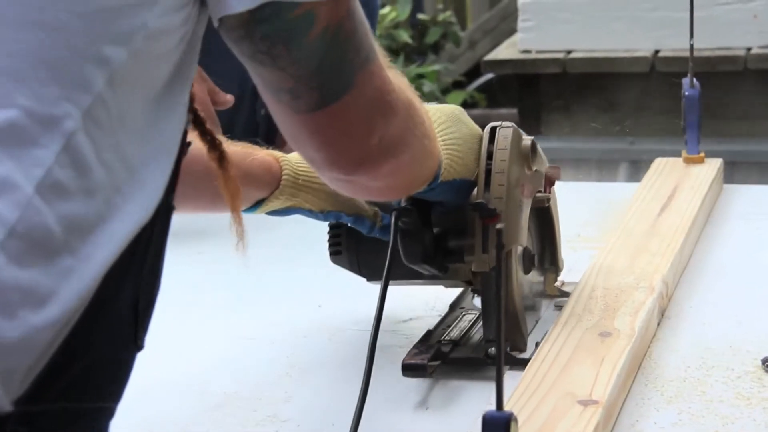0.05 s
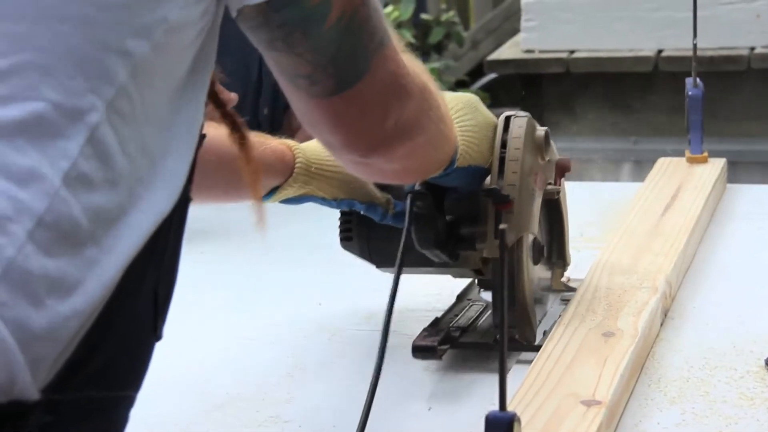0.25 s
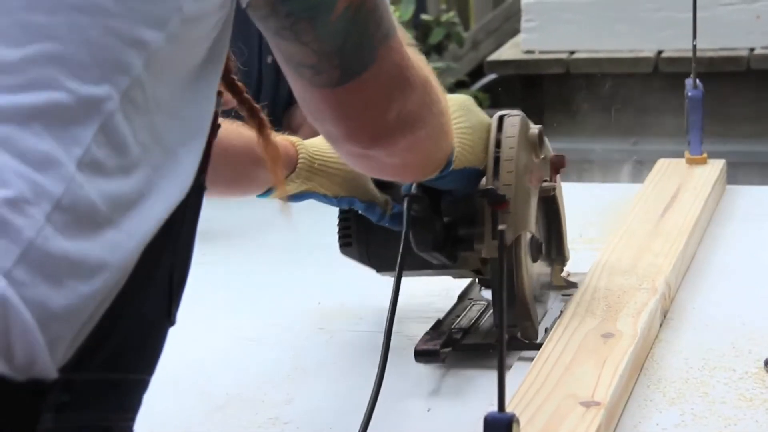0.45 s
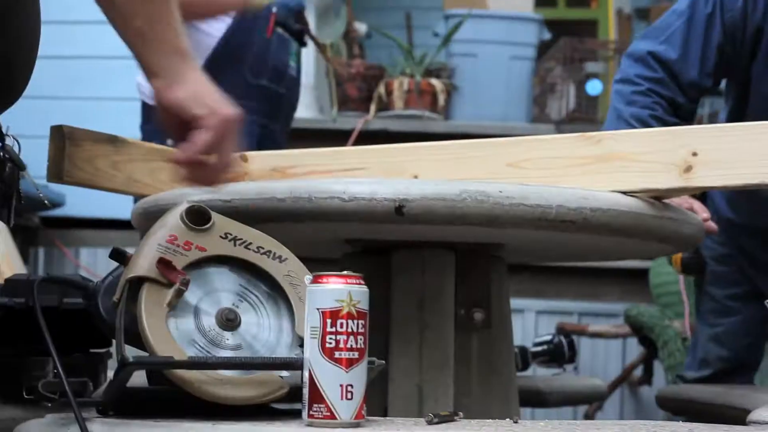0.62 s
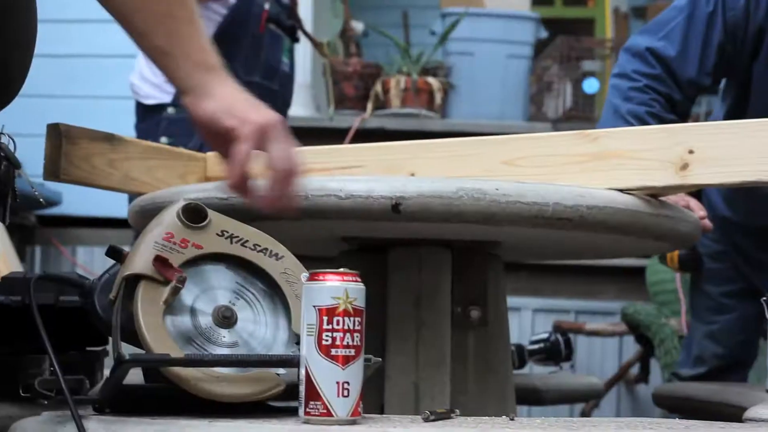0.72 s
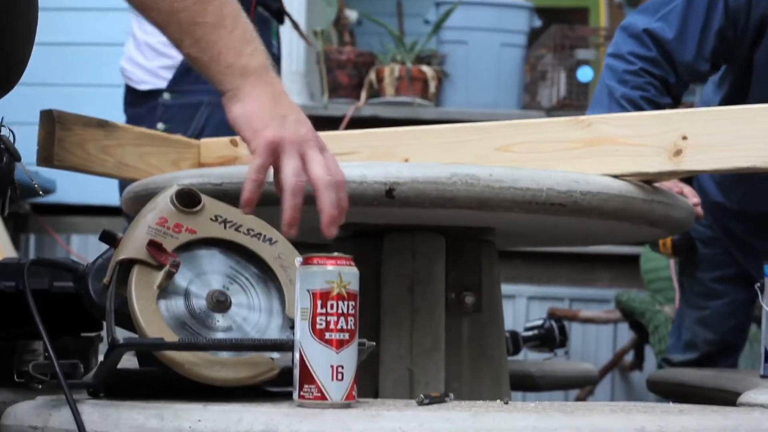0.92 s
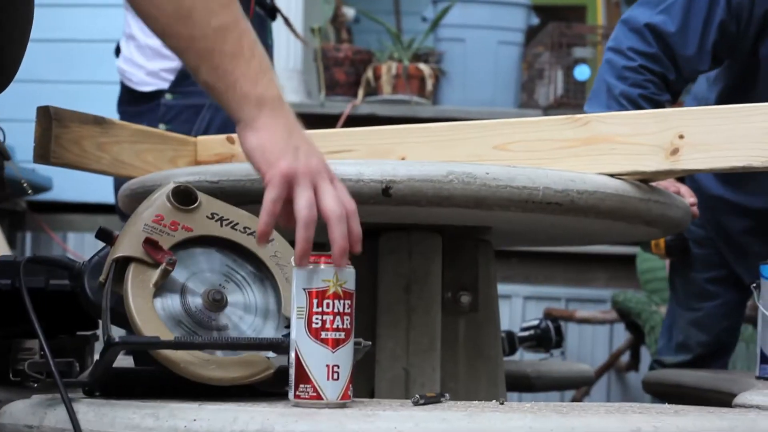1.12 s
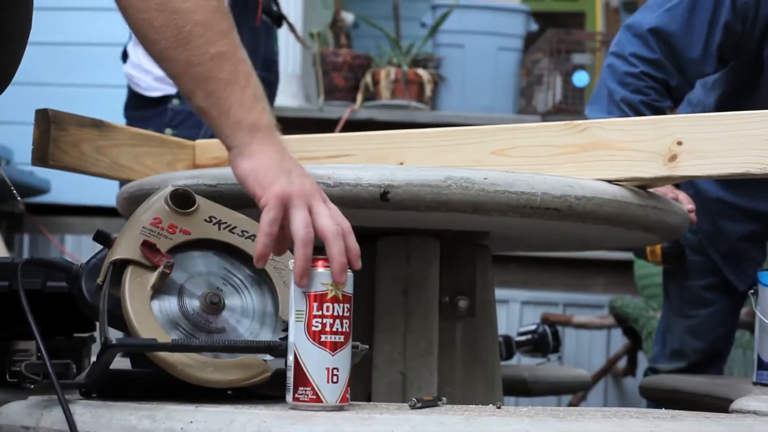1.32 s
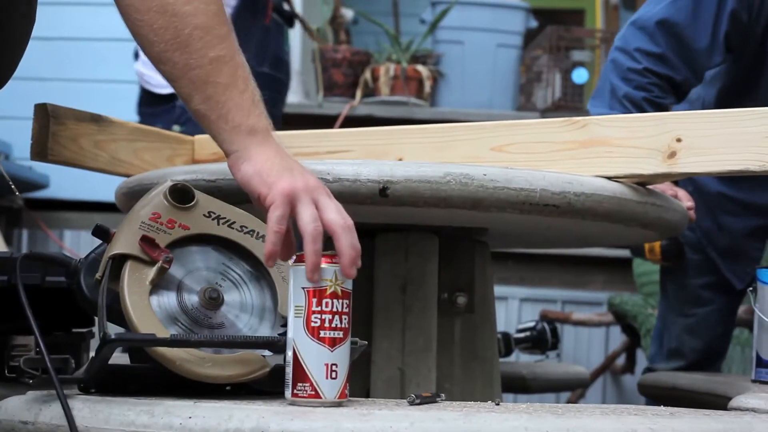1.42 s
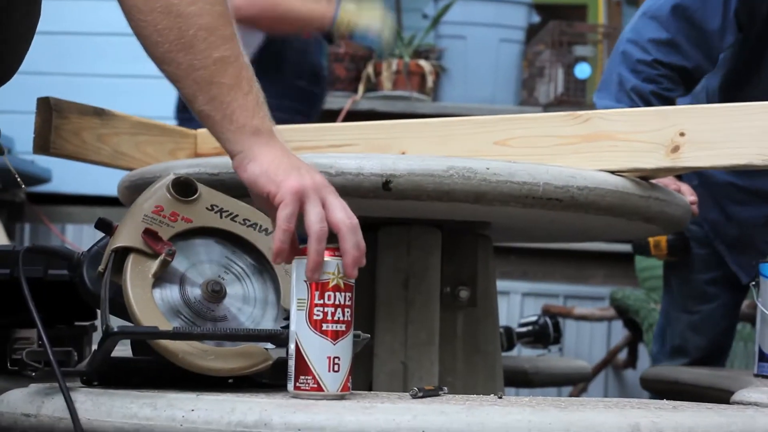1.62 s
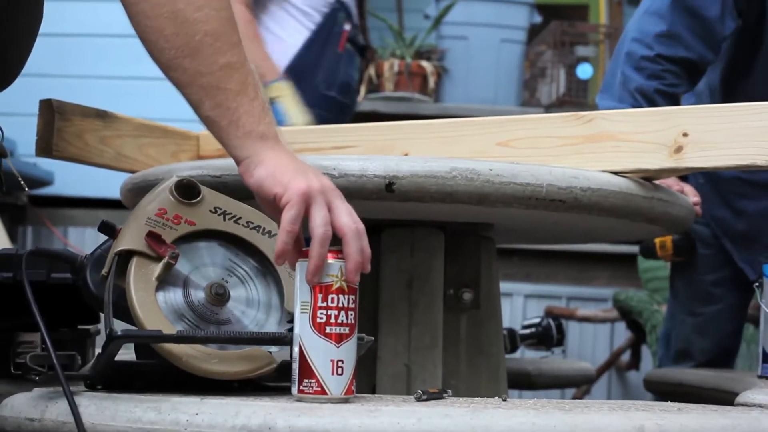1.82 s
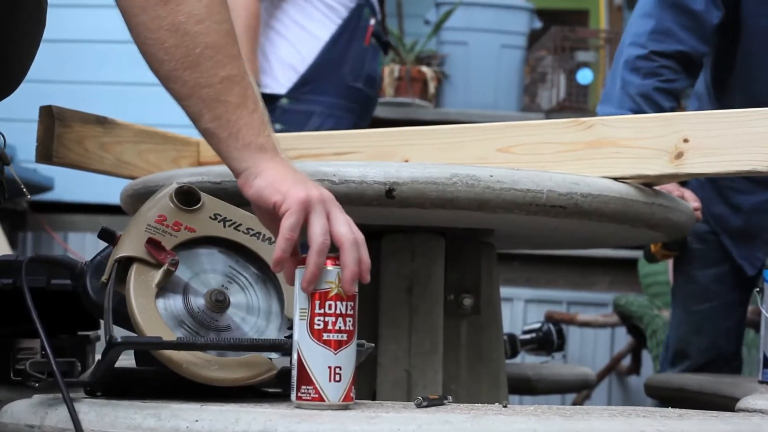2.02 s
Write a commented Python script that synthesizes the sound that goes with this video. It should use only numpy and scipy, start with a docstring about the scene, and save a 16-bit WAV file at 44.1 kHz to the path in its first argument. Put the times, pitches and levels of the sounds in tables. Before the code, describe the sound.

A circular saw whines through a plank, bogs down and stalls, leaving the steel blade ringing and scraping

```python
"""Circular saw stalling in a plank

Outdoors, a blade of 24 teeth whines over the hiss of chips, bogs down and stalls; its tones follow the tooth rate.
The steel disc rings on as fading modes, then rubbing noise swells in the steel's resonances, with harder catches.
Short steady tones come and go. Low noise makes a background rumble and wind puffs that thump the microphone.
The yard adds an echo of fading random reflections."""
import sys
import numpy as np
from scipy import signal
from scipy.fft import rfft, irfft, next_fast_len
from scipy.io import wavfile
from scipy.ndimage import uniform_filter1d, map_coordinates

SR = 44100
rng = np.random.default_rng(int(sys.argv[2]) if len(sys.argv) > 2 else 0)


def master_out(mix):
    """Clip the mix to full scale and print it as 16-bit PCM to the path in sys.argv[1]."""
    frames = np.transpose(np.atleast_2d(mix))
    ceiling = np.clip(frames, -1, 1)
    pcm = np.round(ceiling * 32767).astype(np.int16)
    wavfile.write(sys.argv[1], SR, pcm)


N = 90581
TIME_S = np.arange(N) / SR
RING_S, STALL_FADE_S = 0.928, 0.025  # when the disc starts to ring; fade time of the whine and the rubbing
PATCHY_DB = 1.6  # unevenness of the hiss and rubbing noise


def amp(db):
    """Turn decibels into a plain factor."""
    return 10 ** (np.asarray(db) / 20)


def unit(x):
    """Scale a signal to an rms of 1."""
    return x / np.sqrt(np.mean(np.abs(x) ** 2) + 1e-20)


def curves(rows):
    """Draw straight lines between the rows: one value per sample for each column after the time."""
    times_s, *columns = np.transpose(rows)
    return [np.interp(TIME_S, times_s, column) for column in columns]


def wobble(rate):
    """A smooth random curve through so many random points (knots) a second."""
    knots = rng.standard_normal(int(N * rate / SR) + 4)
    return map_coordinates(knots, [np.arange(N) * rate / SR])


def jitter(rate):
    """A complex random curve of rms 1, with straight lines between so many knots a second."""
    knots = rng.standard_normal((2, int(N * rate / SR) + 2))
    complex_knots = knots[0] + 1j * knots[1]
    return unit(np.interp(np.arange(N) * rate / SR, np.arange(knots.shape[1]), complex_knots))


def filtered(x, response):
    """Multiply the spectrum of x by a complex response of frequency."""
    size = next_fast_len(N + SR // 2)
    hz = np.fft.rfftfreq(size, 1 / SR)
    return irfft(rfft(x, size) * response(hz), size)[..., :N]


def noise(spectrum, patchy_db):
    """Coloured noise of rms 1 whose gain varies in random patches of time and frequency."""
    knot_hz, knot_db = np.transpose(spectrum)
    grid = signal.stft(rng.standard_normal(N), nperseg=512)[2]
    patches = uniform_filter1d(rng.standard_normal(grid.shape), 4, axis=0)
    patches = uniform_filter1d(patches, 8, axis=1)
    patchy = signal.istft(grid * amp(patchy_db * unit(patches)), nperseg=512)[1][:N]

    def colour(hz):
        return amp(np.interp(np.log(hz + 1), np.log(knot_hz + 1), knot_db, -120, -120))

    return unit(filtered(patchy, colour))


def rumble_and_puffs():
    """A low background rumble whose level rises and falls, and short wind puffs of the same noise."""
    # Rumble level before a slight wobble: t/s, level/dB
    rumble_level = [(0, -69), (.7, -64), (.8, -48.5), (1.2, -67.5), (2.05, -47.5)]
    # Wind puffs on the microphone: centre t/s, level/dB
    puffs = [(.02, -46), (.15, -41), (.78, -42), (.86, -62), (1.04, -49), (1.081, -40.5), (1.11, -43),
             (1.16, -40.5), (1.28, -57), (1.68, -52), (1.78, -52), (1.906, -36.5), (1.97, -32.5),
             (2.045, -35.5)]
    # Colour of the low noise, before scaling to rms 1: f/Hz, level per Hz/dB
    low_colour = [(12, -36), (20, -12.5), (64, 1.5), (296, -17.5), (357, -14.5), (400, -15.5), (520, -48),
                  (880, -120)]
    puff_s = .015  # from a puff's centre to 1/e of its height
    envelope = amp(curves(rumble_level)[0] + 0.71 * wobble(11.99))
    for centre_s, db in puffs:
        envelope = envelope + amp(db) * np.exp(-((TIME_S - centre_s) / puff_s) ** 2)
    return envelope * noise(low_colour, patchy_db=1)


def yard_echo(saw):
    """Yard echo: a burst of fading random reflections smears the delayed saw sound."""
    t60_s, level_db, delay_samples = .2, -15, 400
    tail_samples = SR // 3
    tail = rng.standard_normal(tail_samples) * amp(-60 * np.arange(tail_samples) / SR / t60_s)
    tail = tail / np.linalg.norm(tail)
    return amp(level_db) * signal.fftconvolve(np.pad(saw, (delay_samples, 0)), tail)[:N]


def steady_tones():
    """Short sine tones that swell and fade, wavering in level and pitch."""
    # Tones: start t/s, length/s, centre f/Hz, level before wavering/dB
    short_tones = [(0.543, .11, 915, -29), (0.909, 0.098, 1709, -25), (0.919, 0.092, 6035, -28),
                   (0.904, 0.038, 6460, -31), (1.773, 0.039, 5303, -35), (1.777, 0.37, 954, -32),
                   (2.003, 0.13, 5300, -35)]
    waver_db, drift_hz = 4, 5
    total = np.zeros(N)
    for start_s, length_s, hz, db in short_tones:
        progress = np.clip((TIME_S - start_s) / length_s, 0, 1)
        arch = np.sqrt(np.sin(np.pi * progress).clip(0))
        level = amp(db + waver_db * wobble(50))
        phase = 2 * np.pi * np.cumsum(hz + drift_hz * wobble(40)) / SR
        total = total + level * arch * np.sin(phase)
    return total


def catch_envelope():
    """Each harder catch of the rubbing rises fast and dies away more slowly."""
    # Catches: t/s, level before the rise and fall shape/dB
    catch_list = [(1.005, -23), (1.035, -29), (1.46, -29), (1.51, -28.5), (1.555, -30.5), (1.6, -40),
                  (1.683, -25), (1.725, -24.5), (1.775, -30), (1.819, -26), (1.87, -21.5), (1.915, -28),
                  (1.958, -19), (2.006, -20), (2.04, -20.5)]
    rise_s, fall_s = .004, .022
    envelope = np.zeros(N)
    for start_s, db in catch_list:
        since = np.maximum(TIME_S - start_s, 0)
        envelope = envelope + amp(db) * (1 - np.exp(-since / rise_s)) * np.exp(-since / fall_s)
    return envelope


def ticks():
    """Each tick is a pair of quickly dying sine modes."""
    # Ticks: t/s, starting level of each mode/dB, lower mode f/Hz
    tick_list = [(1.019, -20.5, 4190), (1.513, -23, 4140), (1.564, -27, 2620), (1.871, -20.5, 2570)]
    t60_s, upper_ratio = .016, 1.2  # decay time; second mode over the first
    total = np.zeros(N)
    for start_s, db, hz in tick_list:
        since = np.maximum(TIME_S - start_s, 0)
        for ratio in (1, upper_ratio):
            total = total + amp(db - 60 * since / t60_s) * np.sin(2 * np.pi * ratio * hz * since)
    return total


def scraping():
    """Rubbing noise sounds through the steel's resonances, with harder catches and a few ticks."""
    # Rubbing strength before the overall -6 dB: t/s, level/dB
    rub_level = [(0.9, -21), (1.012, -31), (1.316, -29.5), (1.594, -28), (2.05, -23)]
    # Colour of the rubbing, before scaling to rms 1: f/Hz, level per Hz/dB
    rub_colour = [(71, -30), (120, -17), (360, -12.5), (563, -10), (975, -1.5), (1170, -4), (3300, -7),
                  (4760, -9.5), (5960, -11), (7010, -13.5), (15500, -42)]
    # Resonances of the rubbed steel: f/Hz, width/Hz, level before the shared boost/dB
    resonances = [(880, 11, -19), (2940, 25, -22), (3260, 61, 1.5), (3410, 14, 10), (3915, 24, -1.5),
                  (5040, 19, -18), (5270, 9, 13), (5990, 85, 6), (6540, 83, -24), (8050, 270, -7)]
    scrape_db, turn_db, crackle_db = -6, 1.6, 1.7  # overall level; unevenness of the rubbing and of a catch
    boost_db, catch_low_hz = 6, 1160  # boost of all resonances; catches are thinned out below catch_low_hz

    def steel(f):
        modes = sum(amp(db) * 1j * f * width / (centre * centre - f * f + 1j * f * width)
                    for centre, width, db in resonances)
        return 1 + amp(boost_db) * modes

    def low_cut(f):
        return f * f / (f * f + catch_low_hz ** 2)

    fade_in = np.clip((TIME_S - RING_S) / STALL_FADE_S, 0, 1)
    envelope = amp(curves(rub_level)[0] + scrape_db + turn_db * wobble(60)) * fade_in
    rub = noise(rub_colour, PATCHY_DB)
    bright = filtered(noise(rub_colour, patchy_db=3.5), low_cut)
    catches = catch_envelope() * amp(crackle_db * wobble(250)) * bright
    # dividing by the strength of steady rubbing keeps the steel from changing its loudness
    rubbing = filtered(envelope * rub + catches, steel) / np.std(filtered(rub, steel))
    return rubbing + ticks()


def ringing():
    """The freed disc rings in slightly unsteady modes; the rubbing then damps the lower ones most."""
    # Modes of the disc: centre f/Hz, level before swell, waver and decay/dB, t60 before extra damping/s, swell/s
    modes = [(1575, -36, 2, 0.061), (1712, -42, 1.1, 0.017), (1870, -37.5, 7.1, 0.39),
             (2268, -34, 2.6, .04), (4242, -28, .75, .35), (4992, -34, 1.9, .15), (2417, -23, 0.82, 0.043),
             (3160, -63, 3, 0.057), (3280, -57, 4.4, 0.059), (3996, -29, 2.6, 0.11), (4829, -30, .4, .01),
             (5170, -27.5, 1.4, 0.039), (6035, -38, 1.2, .01), (7752, -59, 1.5, .02)]
    waver_db, drift_hz = 1.8, 4
    damp_s, damp_t60_s, damp_hz = 1.55, 1, 2268  # damping starts; its t60 for a mode at damp_hz
    since = np.maximum(TIME_S - RING_S, 0)
    damping_db = 60 * np.maximum(TIME_S - damp_s, 0) / damp_t60_s
    total = np.zeros(N)
    for hz, db, t60_s, swell_s in modes:
        decay_db = 60 * since / t60_s + damping_db * (damp_hz / hz) ** 2
        level = amp(db - decay_db + waver_db * wobble(11.8))
        swell = 1 - np.exp(-since / max(swell_s, 1e-3))
        phase = 2 * np.pi * np.cumsum(hz + drift_hz * wobble(11)) / SR
        total = total + level * swell * np.sin(phase)
    return total


TEETH = 24


def tone(turn, multiple, runout, blur):
    """One tone of rms about 1: uneven teeth swell it in step with the turns, the wood's grain blurs it."""
    slow_hz, fast_hz, fast_share = 49.84, 297.8, .7  # knots a second of the slow and fast blur
    weights = rng.standard_normal((3, 2)) @ [1, 1j]
    spin = np.exp(2j * np.pi * turn)
    pattern = unit(weights[0] * spin + weights[1] / spin + weights[2] * spin ** 2)
    grain = jitter(slow_hz) + fast_share * jitter(fast_hz)
    size = np.sqrt((1 + runout ** 2 + blur ** 2 * (1 + fast_share ** 2)) / 2)
    carrier = np.exp(2j * np.pi * multiple * TEETH * turn)
    return ((1 + runout * pattern + blur * grain) / size * carrier).real


def chip_hiss(hiss_db, stall_s):
    """Chips hiss as coloured noise, with a bright spit just before the stall, then die away."""
    # Colour of the chips, before scaling to rms 1: f/Hz, level per Hz/dB
    chip_colour = [(71, -45), (120, -19.5), (255, -10.5), (432, -21), (917, -4.5), (1830, -7.5),
                   (2110, -0.5), (2810, -7), (4220, 0.5), (5840, -6.5), (7610, 0), (15500, -27)]
    # Colour of the bright spit, before scaling to rms 1: f/Hz, level per Hz/dB
    spit_colour = [(5000, -32), (8500, 5), (12000, -2), (15600, -9)]
    boost_db, swell_db, t60_s = 2, 1, 0.34
    spit_s, spit_rise_s, spit_db = 0.914, 0.07, -36  # time of full strength, rise time, level
    decay_db = 60 * np.maximum(TIME_S - stall_s, 0) / t60_s
    swell = amp(swell_db * wobble(39.76) - decay_db)
    spit_rise = np.exp(-(np.maximum(spit_s - TIME_S, 0) / spit_rise_s) ** 2)
    chips = amp(hiss_db + boost_db) * noise(chip_colour, PATCHY_DB)
    spit = amp(spit_db) * spit_rise * noise(spit_colour, PATCHY_DB)
    return swell * (chips + spit)


def cutting():
    """Teeth and gears whine at multiples of the tooth rate over chip hiss, until the blade stalls."""
    # The cut: t/s, tooth rate f/Hz, level of tones 1 to 6/dB (six columns), hiss level before its boost/dB
    cut = [(0.0, 1100, -22, -21, -13.5, -21, -24, -10.5, -21),
           (0.038, 1093, -25.5, -25.5, -11, -13.5, -19.5, -26, -20.5),
           (0.066, 1090, -26.5, -28, -25.5, -13, -30, -20, -19),
           (0.098, 1086, -21.5, -18.5, -24.5, -18.5, -27.5, -20.5, -20.5),
           (0.148, 1082, -21.5, -19.5, -25, -26.5, -24, -22, -21.5),
           (0.164, 1084, -20.5, -20.5, -30.5, -16.5, -30, -21, -22.5),
           (0.244, 1082, -26.5, -19.5, -30, -28, -22, -26, -21),
           (0.276, 1076, -31.5, -28, -27.5, -32, -31.5, -21.5, -21),
           (0.412, 1081, -22, -23, -22, -22, -27, -34, -19.5),
           (0.426, 1081, -20.5, -25, -22, -16, -38, -25, -24),
           (0.464, 1083, -23, -20.5, -27, -16.5, -33, -22, -22.5),
           (0.524, 1076, -26, -27.5, -25, -19.5, -25.5, -33, -24.5),
           (0.574, 1036, -35.5, -20, -24.5, -32, -38, -32, -25),
           (0.618, 1004, -32.5, -25, -32.5, -24, -24.5, -33, -24),
           (0.668, 1004, -33.5, -16.5, -29, -17, -23, -21, -23.5),
           (0.716, 919.3, -29, -30.5, -35, -25, -34, -28, -24),
           (0.778, 809.4, -27.5, -25.5, -34, -26, -26.5, -32, -26),
           (0.796, 741, -37.5, -29, -42, -36, -26.5, -37, -25.5),
           (0.836, 660, -36, -20.5, -26.5, -34, -37, -35, -27),
           (0.86, 650.8, -69, -30.5, -35, -32, -21.5, -41, -25.5),
           (.895, 602, -50, -29.5, -57, -58, -55, -37, -25.5),
           (.93, 592, -48, -36, -51, -52, -52, -35, -29.5), (.96, 570, -61, -36, -48, -51, -55, -52, -31.5)]
    # Lowest six tones: multiple of the tooth rate, runout depth (how uneven the teeth are), blur before bogging
    low_tones = [(1, 0.15, 0.07), (2, 0.26, 0.18), (3, 0.3, 0.3), (4, 0.22, 0.16), (5, .4, 0.45),
                 (6, 1, 0.24)]
    # Higher tooth tones: multiple of the tooth rate, level over the hiss column before slowing and wander/dB
    high_tones = [(7, -7.5), (8, -5.5), (9, -14.5), (10, -20), (11, -17.5), (12, -21), (13, -26), (14, -25),
                  (15, -34), (16, -32)]
    # Gear tones: multiple of the tooth rate, level over the hiss column before slowing and wander/dB
    gear_tones = [(2.22, -17), (3.3, -22), (4.44, -38), (6.65, -19.5), (7.18, -12)]
    stall_s, full_hz = 0.921, 1085  # time of the stall; tooth rate at full speed
    slowing_db, bog_blur = 10, .9  # higher tones lose this, and all tones blur more, per octave of lost speed
    wander_db, wander_rate = 3, 25
    high_runout, high_blur = .4, .07  # high_blur is multiplied by the tone's multiple

    rate_hz, *low_db, hiss_db = curves(cut)
    turn = np.cumsum(rate_hz) / SR / TEETH
    lost_octaves = np.clip(np.log2(full_hz / rate_hz), 0, None)
    bog = bog_blur * lost_octaves
    whine = np.zeros(N)
    for db, (multiple, runout, blur) in zip(low_db, low_tones):
        whine = whine + amp(db) * tone(turn, multiple, runout, blur + bog)
    for multiple, db in high_tones + gear_tones:
        level_db = hiss_db + db - slowing_db * lost_octaves + wander_db * wobble(wander_rate)
        whine = whine + amp(level_db) * tone(turn, multiple, high_runout, high_blur * multiple + bog)
    gate = np.clip((stall_s + STALL_FADE_S - TIME_S) / STALL_FADE_S, 0, 1)
    return gate * whine + chip_hiss(hiss_db, stall_s)


def scene():
    """Add the rumble, the wind puffs and the yard's echo to the sounds of the saw."""
    saw = steady_tones() + scraping() + ringing() + cutting()
    return (rumble_and_puffs() + yard_echo(saw) + saw)[None]


def record(dry):
    """The input rounds off the highest peaks, thins out the lowest sound and cuts off the top."""
    ceiling, low_hz, top_hz = .68, 30, 15700
    rounded = dry / (1 + np.abs(dry / ceiling) ** 6) ** (1 / 6)
    return filtered(rounded, lambda hz: (hz < top_hz) * 1j * hz / (low_hz + 1j * hz))


dry = scene()
out = record(dry)
master_out(out)
```